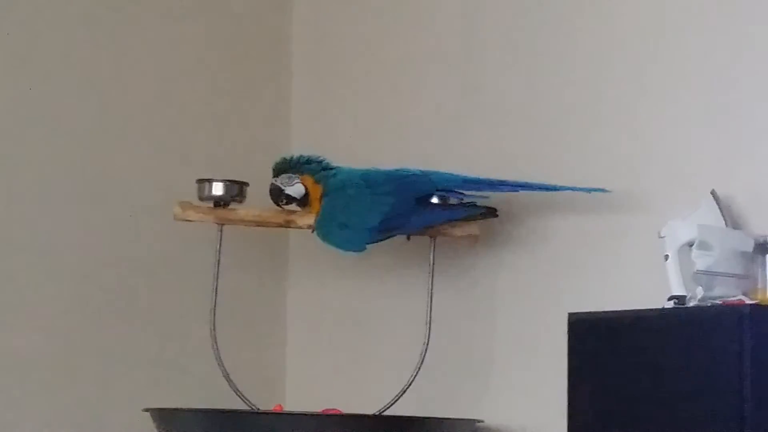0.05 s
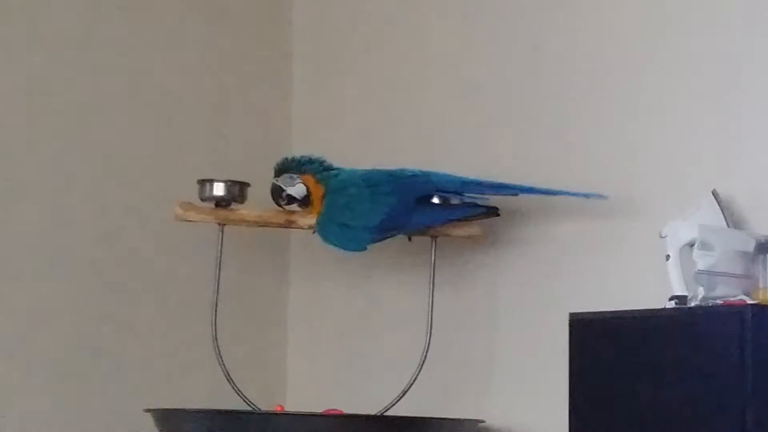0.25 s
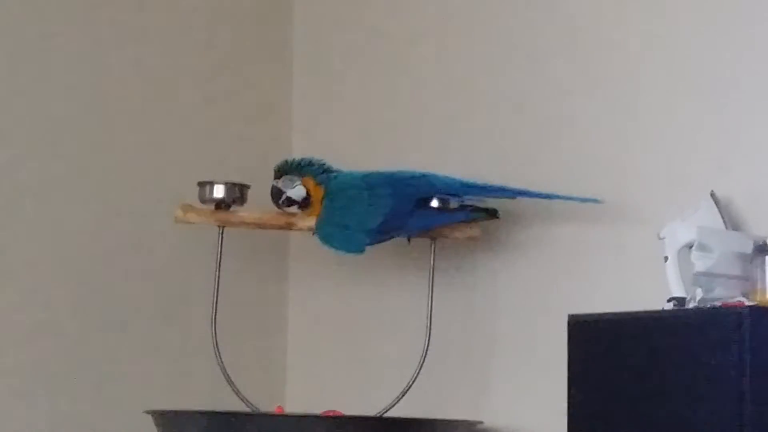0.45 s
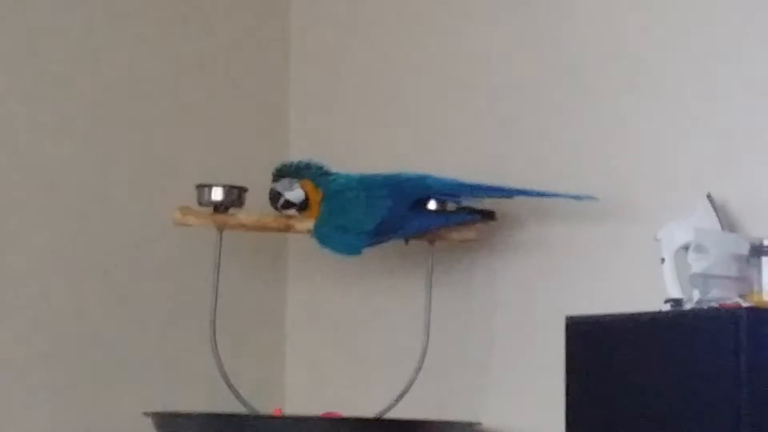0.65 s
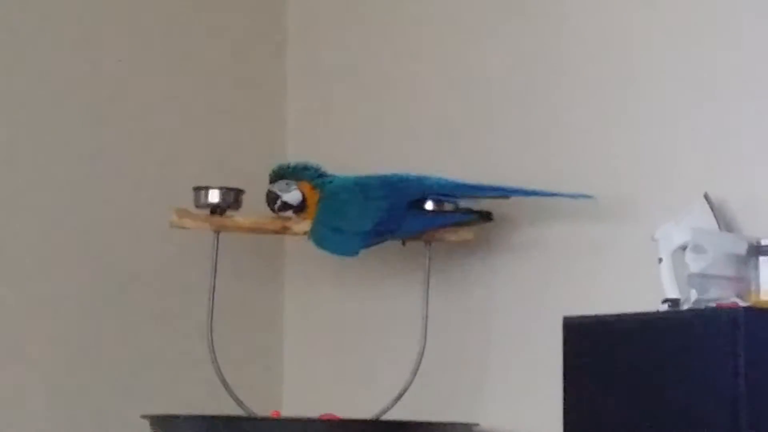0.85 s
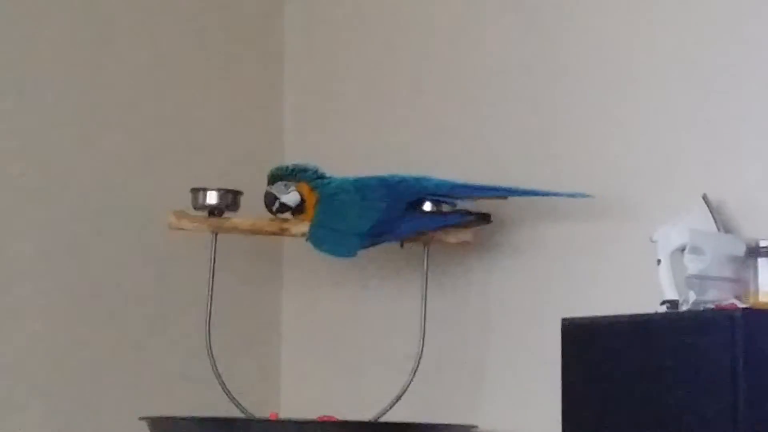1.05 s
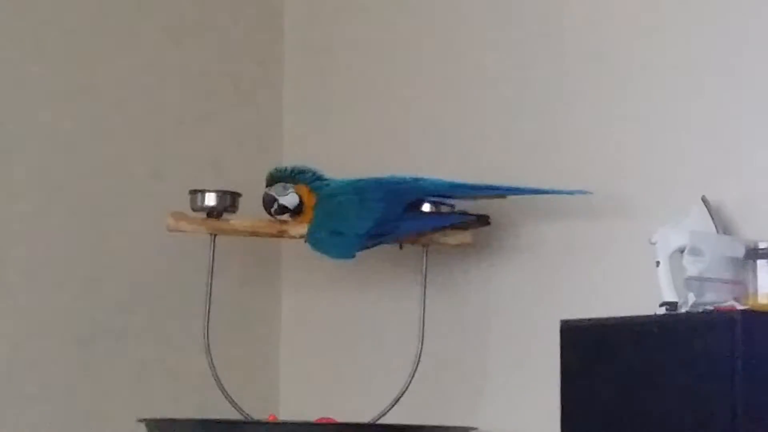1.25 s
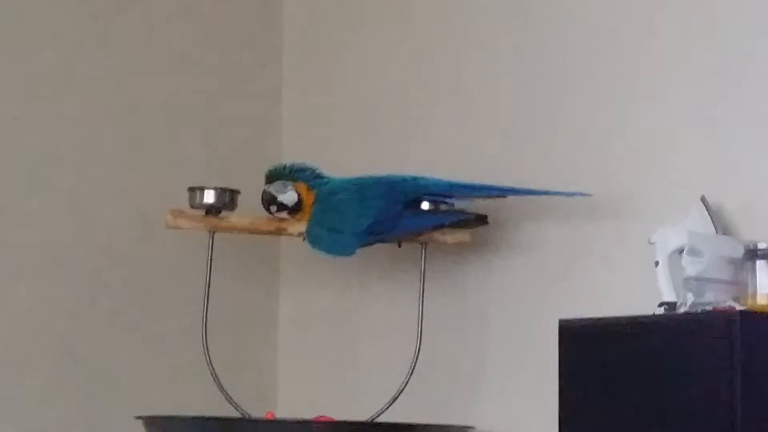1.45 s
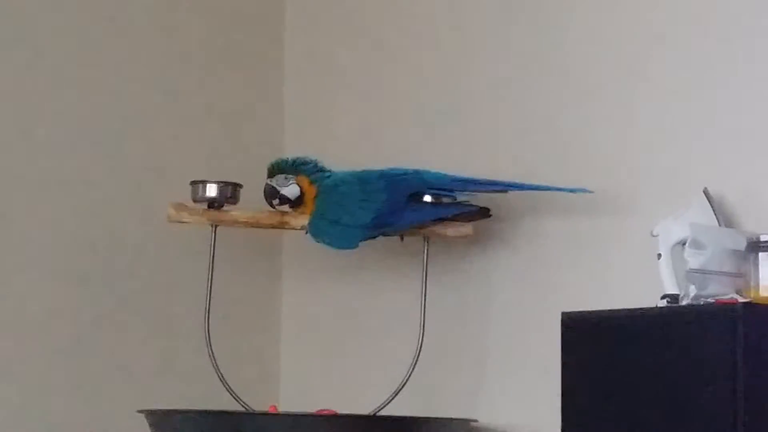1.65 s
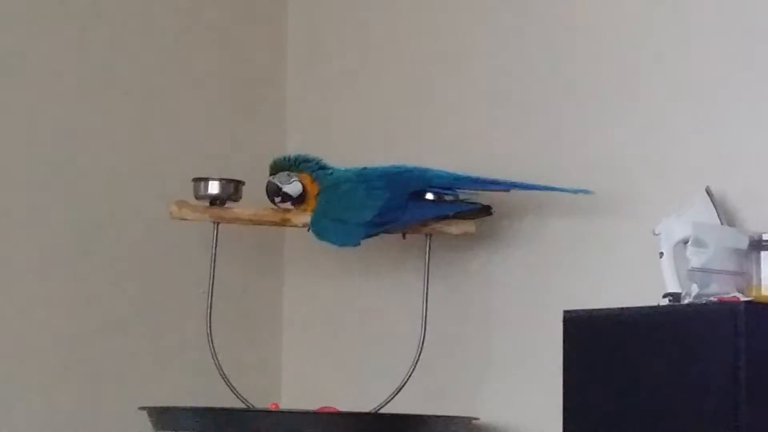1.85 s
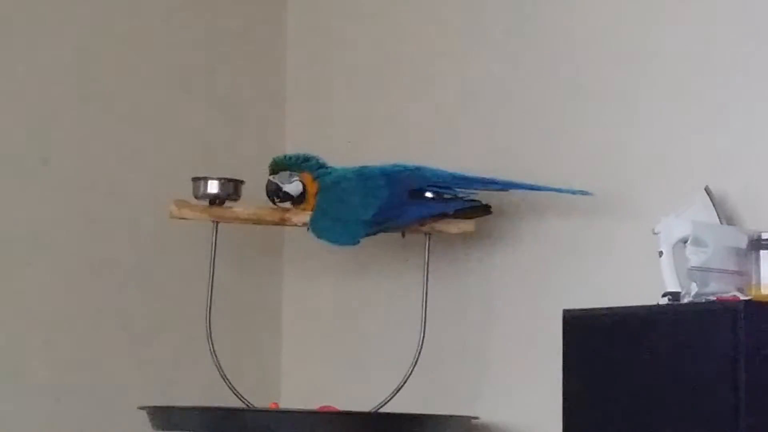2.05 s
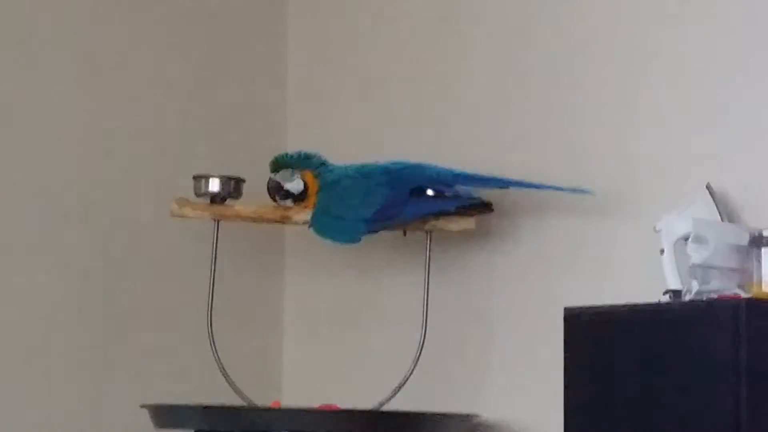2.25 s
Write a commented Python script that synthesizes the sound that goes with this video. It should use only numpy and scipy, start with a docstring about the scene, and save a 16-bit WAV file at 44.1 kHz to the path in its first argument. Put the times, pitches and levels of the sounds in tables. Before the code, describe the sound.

One hoarse, shrill macaw screech in a small room, then a short knock on the microphone.

```python
"""Macaw screech in a small living room.

One screech: a hoarse rasp of throat air breaks into a rough, shrill syrinx tone that flips
between two close pitches. The walls ring briefly, then something knocks the left microphone.
Mains hum, low rumble and faint hiss lie underneath."""
import sys
import numpy as np
from scipy import signal
from scipy.fft import rfft, irfft
from scipy.io import wavfile

SR = 44100
rng = np.random.default_rng(int(sys.argv[2]) if len(sys.argv) > 2 else 0)


def waveform_to_disk(signal):
    """Save audio, clipped to [-1, 1], as 16-bit WAV at the path in sys.argv[1]."""
    frames = np.transpose(np.atleast_2d(signal))
    scaled = np.clip(frames, -1, 1) * 32767
    samples = np.round(scaled).astype(np.int16)
    wavfile.write(sys.argv[1], SR, samples)


N = 105840
TIME_S = np.arange(N) / SR
EDGES_HZ = np.geomspace(25, 16000, 37)
CENTRES_HZ = np.sqrt(EDGES_HZ[:-1] * EDGES_HZ[1:])
FLUTTER_HZ = 112   # uneven air stream


def from_db(db):
    """Decibels to gain."""
    return 10 ** (np.asarray(db) / 20)


def unit_rms(x):
    """Scale to unit power."""
    return x / np.sqrt(np.mean(x ** 2) + 1e-20)


def in_time(rows):
    """Control curve at every sample."""
    return np.interp(TIME_S, *np.transpose(rows))


def at_hz(rows, hz):
    """Table lookup on a log-frequency axis."""
    freqs_hz, values = np.transpose(rows)
    return np.interp(np.log(hz), np.log(freqs_hz), values)


def pan(left_minus_right_db):
    """Constant-power left and right gains."""
    return unit_rms(from_db(np.array([[1], [-1]]) * left_minus_right_db / 2))


def drift(rate_hz):
    """Smooth random motion, unit rms."""
    r = np.exp(-2 * np.pi * rate_hz / SR)
    return unit_rms(signal.lfilter([1], [1, -2 * r, r * r], rng.standard_normal(N + SR))[SR:])


def band(x, k):
    """Band k, about a quarter octave wide."""
    return signal.sosfilt(signal.butter(2, EDGES_HZ[k:k + 2], "band", fs=SR, output="sos"), x)


def stereo(pair, correlation):
    """Blend two independent noises to a left-right correlation."""
    mid = np.sqrt(1 + correlation) * pair[0]
    side = np.sqrt(1 - correlation) * pair[1]
    return np.array([mid + side, mid - side]) / np.sqrt(2)


def coloured(spectrum):
    """Unit-rms noise, rolled off below the spectrum's first point."""
    hz = np.fft.rfftfreq(N, 1 / SR) + 1
    low_cut = 1 / np.sqrt(1 + (spectrum[0][0] / hz) ** 4)
    return unit_rms(irfft(rfft(rng.standard_normal(N)) * from_db(at_hz(spectrum, hz)) * low_cut, N))


def swell(rows):
    """Gain from a dB curve, silent outside it."""
    return from_db(in_time(rows)) * (TIME_S > rows[0][0]) * (TIME_S < rows[-1][0])


def puffs(rows):
    """Gaussian swells of noise, one resonance each."""
    out = 0
    for peak_s, level_db, sigma_s, hz, width_hz in rows:
        noise = signal.lfilter(*signal.iirpeak(hz, hz / width_hz, fs=SR), rng.standard_normal(N))
        out += from_db(level_db) * unit_rms(noise) * np.exp(-.5 * ((TIME_S - peak_s) / sigma_s) ** 2)
    return out


def background():
    """Wavering appliance hum over room rumble and faint hiss."""
    # hum partials: pitch_hz, level_db, left_minus_right_db
    partials = [(120, -47, -5), (647, -71.5, -9)]
    # noise floor: freq_hz, density_db
    spectrum = [(30, -50), (45, -8.5), (60, 0), (100, -1), (170, -2.5), (250, -9.5), (400, -16.5),
                (700, -17.5), (1000, -25), (1700, -28), (3300, -29), (4500, -26.5), (6300, -20),
                (7700, -29), (11000, -30.5), (14500, -31.5)]
    # floor balance: freq_hz, left_minus_right_db
    balance = [(80, 5.5), (250, -4), (1300, -2.5), (3200, -0.5), (4200, 2.5), (5200, 11), (6400, 12),
               (7600, 4), (11000, 0)]
    # floor width: freq_hz, correlation
    likeness = [(60, 0.94), (300, 0.77), (1300, 0.018), (4000, 0), (12000, 0)]
    waver_db, floor_db = 2.5, -54.5
    hum = noise = 0
    for hz, level_db, side_db in partials:
        gain = np.sqrt(2) * from_db(level_db + waver_db * drift(rate_hz=3.3))
        hum += gain * pan(side_db) * np.sin(2 * np.pi * (hz * TIME_S + rng.random()))
    white = rng.standard_normal((2, 2, N))
    for k, hz in enumerate(CENTRES_HZ):
        pair = stereo(white[k % 2], at_hz(likeness, hz))
        noise += from_db(at_hz(spectrum, hz)) * pan(at_hz(balance, hz)) * band(pair, k)
    return hum + from_db(floor_db) * unit_rms(noise)


def rustles():
    """Faint rustles before and after the call."""
    # noise swells: peak_s, level_db, sigma_s, centre_hz, width_hz
    swells = [(.135, -64.5, 0.047, 1680, 2030), (1.54, -69.5, 0.18, 1210, 600)]
    return puffs(swells)


def rasp():
    """Fluttering throat turbulence with a thin whistle; the colour shifts as the beak opens."""
    # forced air: time_s, level_db
    levels = [(.247, -66), (.27, -47.5), (.295, -42), (.34, -50.5), (.39, -43), (.48, -44.5), (.56, -43.5),
              (.7, -42.5), (.79, -38), (1.0, -39.5), (1.19, -38.5), (1.225, -55), (1.27, -57)]
    # beak half closed: freq_hz, density_db
    half_closed = [(150, -26), (250, -7.5), (340, -16), (414, -18), (500, -6.5), (700, -5), (860, -10),
                   (1090, 1.5), (1430, 2), (1620, -3.5), (2300, -7), (2700, -5.5), (3150, -8.5), (3850, -3),
                   (4450, -13.5), (5200, -8), (6900, -14.5), (8500, -17.5), (9500, -13), (12400, -22.5),
                   (14000, -41)]
    # beak wide open: freq_hz, density_db
    wide_open = [(250, -1), (420, -13.5), (650, -3.5), (820, -9.5), (1020, -5), (1150, 9.5), (1380, 8.5),
                 (1700, -5), (2230, -5), (2500, 3.5), (2900, -1), (3210, -4.5), (3790, 3), (4410, -4),
                 (5200, -2.5), (6060, -9), (6850, -8.5), (8170, -11), (9500, -7.5), (12700, -17),
                 (14000, -39)]
    open_start_s, opening_s, flutter_db = 0.632, 0.156, 2
    whistle_hz, whistle_width_hz, whistle_db = 6950, 205, 5
    opened = np.clip((TIME_S - open_start_s) / opening_s, 0, 1)
    air = np.sqrt(1 - opened) * coloured(half_closed) + np.sqrt(opened) * coloured(wide_open)
    air *= from_db(flutter_db * drift(FLUTTER_HZ))
    whistle = signal.lfilter(*signal.iirpeak(whistle_hz, whistle_hz / whistle_width_hz, fs=SR), air)
    return swell(levels) * unit_rms(air + from_db(whistle_db) * whistle)


def beak_hiss():
    """Bright air through the beak as the call starts and after it ends."""
    # hiss envelope: time_s, level_db
    levels = [(.255, -52), (.27, -44.5), (.29, -43.5), (.315, -57), (.35, -44.5), (.42, -92), (1.22, -97),
              (1.285, -52), (1.35, -64.5), (1.42, -69)]
    # hiss colour: freq_hz, density_db
    spectrum = [(2000, 2.5), (4300, -2), (5300, 8), (7000, 4), (8200, -3), (9600, 1), (12500, -4.5),
                (14000, -14)]
    return swell(levels) * coloured(spectrum)


def croaks():
    """Short resonant croaks of the throat."""
    # noise bursts: peak_s, level_db, sigma_s, centre_hz, width_hz
    bursts = [(0.291, -39.5, 0.0023, 910, 596), (0.55, -48, 0.027, 1110, 800),
              (0.868, -44.5, 0.012, 960, 80), (0.912, -46, 0.029, 2940, 200),
              (1.289, -39.5, 0.0027, 990, 121), (1.292, -54.5, 0.0041, 1530, 600),
              (1.321, -49, 0.0044, 804, 260)]
    return puffs(bursts)


def growl():
    """The syrinx flaps weakly at a low pitch before the shrill tone takes hold."""
    # growl envelope: time_s, level_db
    levels = [(.34, -72), (.365, -51.5), (.46, -58), (.5, -54.5), (.6, -58), (.68, -64)]
    # growl harmonics: multiple, relative_db
    harmonics = [(1, 5.5), (2, 6.5), (3, -18), (4, 4)]
    pitch_hz, jitter = 343, 0.0314
    phase = 2 * np.pi * np.cumsum(pitch_hz * (1 + jitter * drift(FLUTTER_HZ))) / SR
    return swell(levels) * unit_rms(sum(from_db(db) * np.sin(k * phase) for k, db in harmonics))


def voice():
    """The syrinx oscillates, unsteady in pitch and level; its overtones are rougher still."""
    # syrinx envelope: time_s, level_db
    levels = [(.53, -53), (.62, -52.5), (.69, -43.5), (.74, -48.5), (.79, -39), (.86, -52), (.96, -38),
              (1.0, -37.5), (1.04, -46.5), (1.13, -40), (1.21, -40.5), (1.235, -53), (1.26, -77)]
    # syrinx glide: time_s, pitch_hz
    glide = [(.6, 1330), (.72, 1335), (.795, 1275), (.85, 1285), (.92, 1275), (.97, 1230), (1.03, 1228),
             (1.08, 1240), (1.14, 1255), (1.185, 1278), (1.215, 1385)]
    # syrinx harmonics: multiple, relative_db
    harmonics = [(1, 7.5), (2, -5), (3, -6), (4, -10), (5, -17.5)]
    jitter, wobble, scatter_rad, shimmer_db = .013, .005, 0.36, 1.5
    hz = in_time(glide) * (1 + jitter * drift(rate_hz=500) + wobble * drift(rate_hz=40))
    phase = 2 * np.pi * np.cumsum(hz) / SR
    scatter = scatter_rad * drift(rate_hz=91)
    tone = sum(from_db(db) * np.sin(k * phase + (k > 1) * scatter) for k, db in harmonics)
    return swell(levels) * unit_rms(tone * from_db(shimmer_db * drift(FLUTTER_HZ)))


def squeal():
    """Air rings a narrow, sinking throat resonance."""
    # resonance envelope: time_s, level_db
    levels = [(.64, -72), (.705, -46), (.75, -61), (.835, -44.5), (.92, -70), (1.0, -50), (1.12, -53),
              (1.215, -52), (1.24, -75)]
    # resonance glide: time_s, centre_hz
    glide = [(.7, 2747.5), (.79, 2736.5), (.84, 2590), (1.0, 2446.5), (1.13, 2445.5), (1.22, 2487)]
    spread_hz = 47
    phase = 2 * np.pi * np.cumsum(in_time(glide)) / SR
    return swell(levels) * (drift(spread_hz) * np.cos(phase) + drift(spread_hz) * np.sin(phase))


def notes():
    """Clear core of the screech: two close pitches alternate, beat on overlap, then leap up."""
    # low note: time_s, level_db
    low = [(.745, -61), (.765, -34.5), (0.796, -31), (.85, -54), (.9, -48), (.935, -34), (.97, -34.5),
           (1.035, -46), (1.06, -32.5), (1.095, -44), (1.125, -28.5), (1.155, -31.5), (1.19, -50.5),
           (1.245, -50), (1.27, -68)]
    # high note: time_s, level_db
    high = [(.64, -59), (.7, -55), (.725, -38), (.755, -35), (.8, -58), (.83, -34), (.91, -39), (.955, -47),
            (.99, -39.5), (1.025, -49), (1.06, -38.5), (1.115, -33), (1.165, -39), (1.195, -38),
            (1.235, -48), (1.26, -68)]
    # closing leap: time_s, level_db
    leap = [(1.185, -70), (1.208, -38), (1.235, -62)]
    low_hz, high_hz, leap_hz, scatter_rad = 1247.4, 1302, 1378, .2
    out = 0
    for hz, levels in ((low_hz, low), (high_hz, high), (leap_hz, leap)):
        phase = 2 * np.pi * hz * TIME_S + scatter_rad * drift(rate_hz=70)
        out += swell(levels) * np.sqrt(2) * np.sin(phase)
    return out


def room(direct, to_walls):
    """Direct sound, dense reflections dying band by band, and standing waves; bird to the right."""
    # reflection decay: freq_hz, t60_s
    decay_times = [(300, 0.32), (1300, 0.5), (4000, 0.41), (12000, 0.18)]
    # reflection strength: freq_hz, gain_db
    strength = [(400, -4), (900, 3.5), (1300, 0.5), (2000, 4.5), (5000, 3), (12000, 10)]
    # reflection width: freq_hz, correlation
    likeness = [(300, 0.92), (1300, -0.034), (2600, -0.14), (5000, -0.51), (12000, 0.32)]
    # standing waves: freq_hz, t60_s, gain_db
    modes = [(1237, 0.28, -1), (1301, 0.17, -5), (2413, 0.2, 5.5), (2555, 0.16, -1), (2758, 0.23, 7),
             (2830, 0.43, 7.5), (3390, 0.16, 6), (3671, 0.19, 3.5), (3828, 0.27, 8), (4150, 0.28, 6)]
    # bird balance: freq_hz, left_minus_right_db
    balance = [(300, -6), (800, -1.5), (1300, -7.5), (2500, -7), (3700, -3), (5000, -11.5), (6500, -8.5),
               (9500, -13.5), (13000, -57)]
    first_echo_s = 0.0036
    t = TIME_S[:SR]
    white = rng.standard_normal((2, 2, SR))
    response = 0
    for k, hz in enumerate(CENTRES_HZ):
        decay = from_db(-60 * t / at_hz(decay_times, hz)) * (t > first_echo_s)
        echoes = stereo(white[k % 2], at_hz(likeness, hz)) * decay / np.linalg.norm(decay)
        response += from_db(at_hz(strength, hz)) * band(echoes, k)
    for hz, t60_s, gain_db in modes:
        decay = from_db(-60 * t / t60_s)
        response += 2 * from_db(gain_db) * np.cos(2 * np.pi * hz * t) * decay / decay.sum()
    heard = direct + signal.fftconvolve(to_walls[None], response, axes=1)[:, :N]
    bins_hz = np.fft.rfftfreq(N, 1 / SR) + 1
    sides = from_db(at_hz(balance, bins_hz) * [[1], [-1]] / 2)
    # divide out the power added by panning and reflections
    power = np.mean(sides ** 2, axis=0) * (1 + from_db(at_hz(strength, bins_hz)) ** 2)
    return irfft(rfft(heard) * sides / np.sqrt(power), N)


def knock():
    """Two quick pressure steps on the left microphone; its bass cut makes them a short thump."""
    # pressure steps: start_s, step_db
    jolts = [(1.4438, -16.3), (1.4446, -18.5)]
    bass_cut_hz, treble_cut_hz, right_db = 76, 5100, -44
    steps = sum(from_db(step_db) * (TIME_S >= start_s) for start_s, step_db in jolts)
    thump = signal.sosfilt(signal.butter(5, bass_cut_hz, "high", fs=SR, output="sos"), steps)
    return signal.lfilter(*signal.butter(1, treble_cut_hz, fs=SR), thump) * from_db([[0], [right_db]])


def scene():
    """Bird in the room, knock and background."""
    core_to_walls_db = -8.5
    bird = rasp() + voice() + squeal() + growl() + croaks() + rustles() + beak_hiss()
    core = notes()
    return room(bird + core, bird + from_db(core_to_walls_db) * core) + knock() + background()


def record(dry):
    """Steep treble cut."""
    cutoff_hz = 14500
    return signal.sosfilt(signal.ellip(10, .2, 70, cutoff_hz, fs=SR, output="sos"), dry)


dry = scene()
out = record(dry)
waveform_to_disk(out)
```